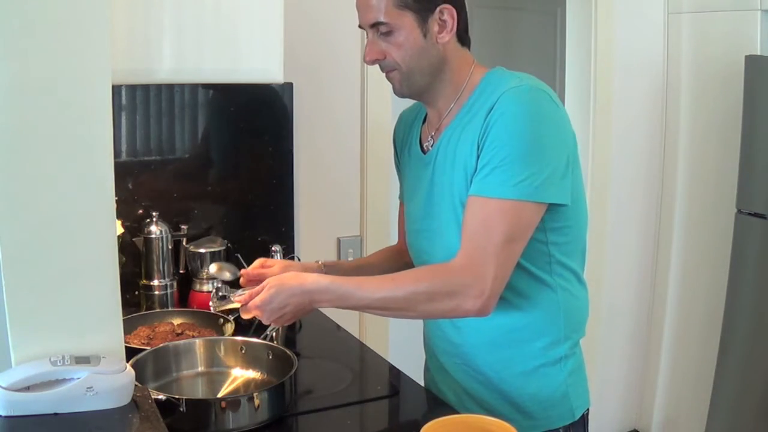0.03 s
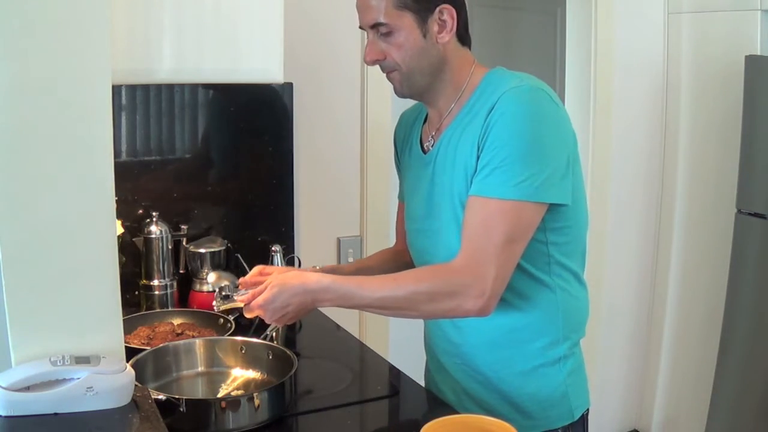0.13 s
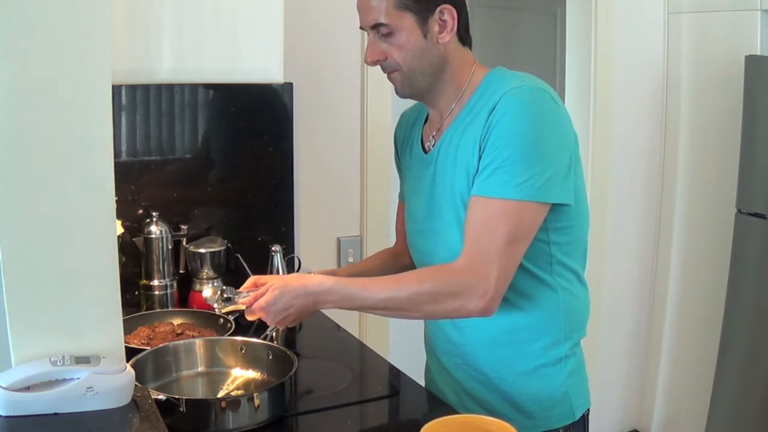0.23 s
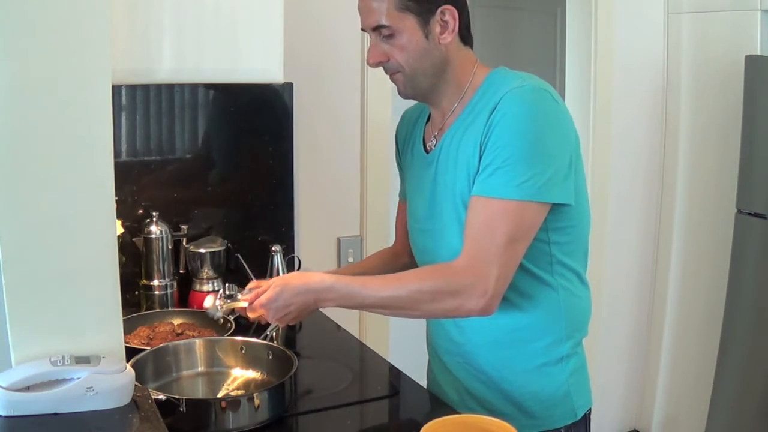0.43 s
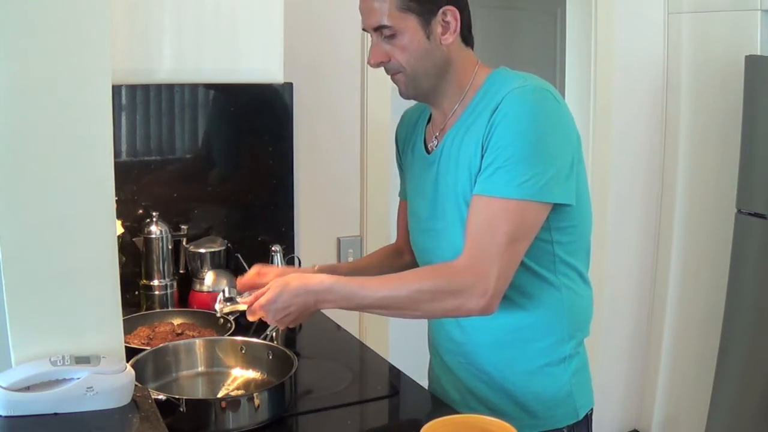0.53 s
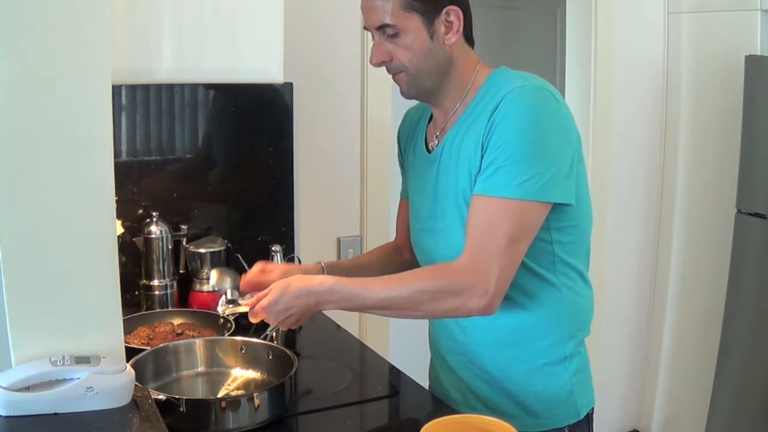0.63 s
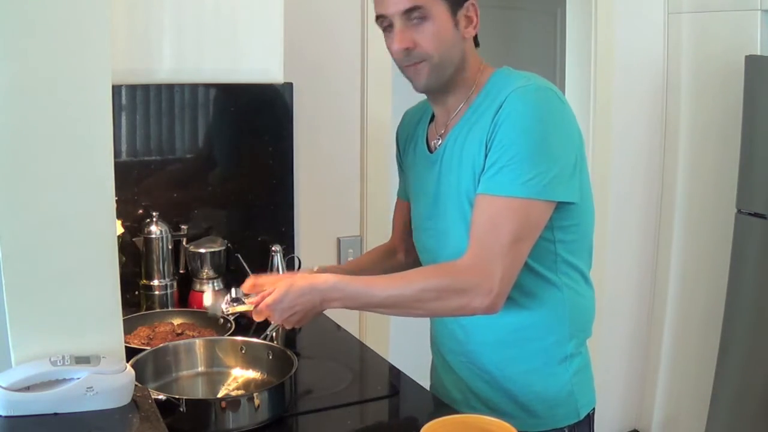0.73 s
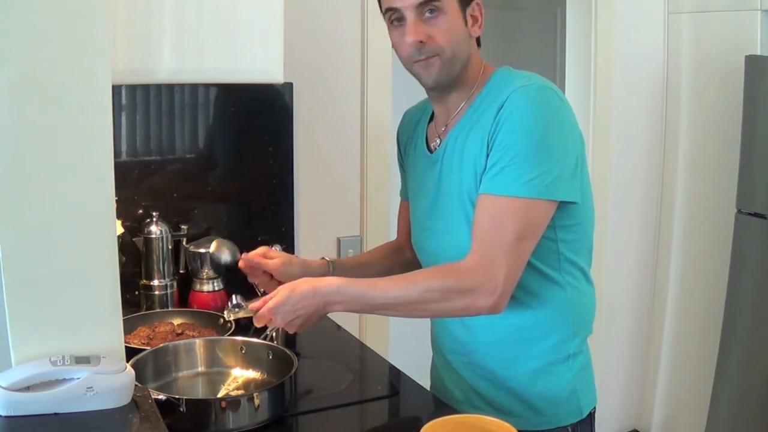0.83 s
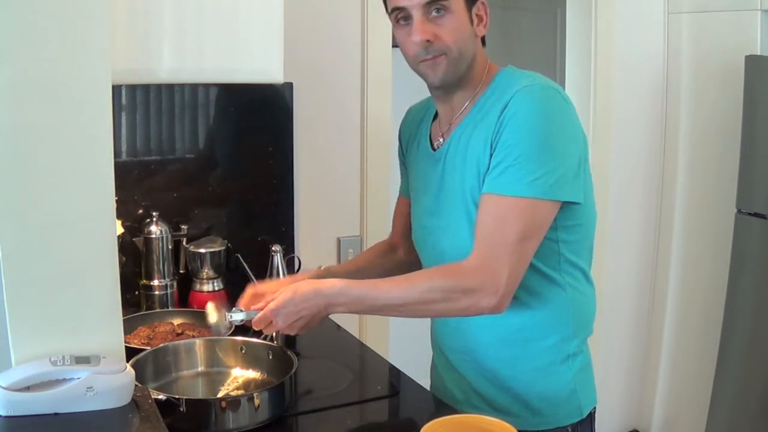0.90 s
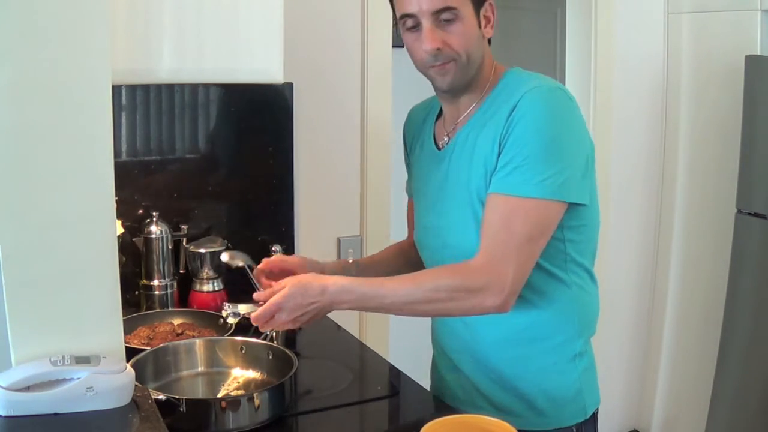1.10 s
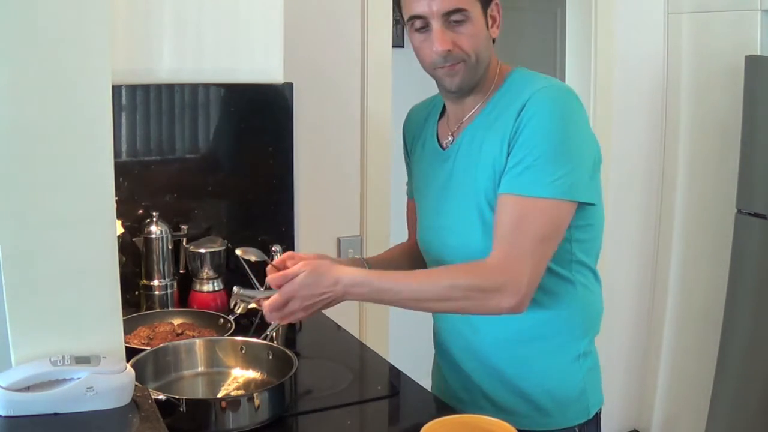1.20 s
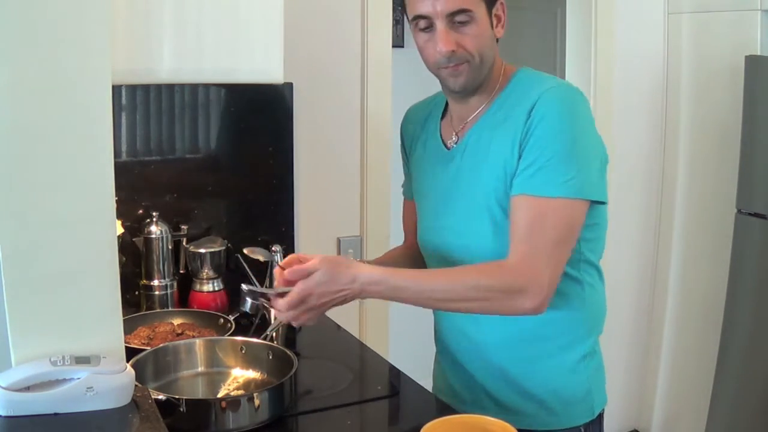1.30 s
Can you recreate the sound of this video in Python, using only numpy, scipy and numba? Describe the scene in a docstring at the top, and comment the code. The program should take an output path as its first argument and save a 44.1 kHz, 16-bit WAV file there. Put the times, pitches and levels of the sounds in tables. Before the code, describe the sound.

Three hard, dry metallic clacks of spoon on garlic press ring briefly off kitchen walls; garlic drops into hot oil, which sizzles on with small crackles above low fan noise, heard from a camera a few metres off.

```python
"""Garlic press and hot oil

Modal synthesis: a spoon knocks three times on a metal garlic press, each knock a click plus decaying modes,
while an earlier knock still dies away. A train of random bubble clicks over hiss makes hot oil sizzle
as garlic drops in; coloured noise and wavering tones make the extractor fan. Dense decaying noise echoes
form the hard-walled kitchen, heard by a camera a few metres from the press."""
import sys
import numpy as np
from scipy import signal
from scipy.fft import rfft, irfft, next_fast_len
from scipy.io import wavfile
from scipy.ndimage import uniform_filter1d
from numba import njit

SR = 44100
rng = np.random.default_rng(int(sys.argv[2]) if len(sys.argv) > 2 else 0)


def invert_db(x):
    """Field ratio 10**(x/20) for x, a level in decibels (scalar or array-like)."""
    u = np.asarray(x, float) / 20
    return 10 ** u


def bounce(signal):
    """Save signal as a 16-bit WAV file at the path given by the first command-line argument."""
    frames = np.transpose(np.atleast_2d(signal))
    limited = np.clip(frames, -1, 1)
    pcm = np.round(limited * 32767).astype(np.int16)
    wavfile.write(sys.argv[1], SR, pcm)


N = 59535  # length in samples
LEAD_S = 0.2  # knocks are computed from this long before the start


def curve(hz, table):
    """Logarithmic frequency scale: interpolates (f/Hz, value) points."""
    points = np.array(table, float)
    return np.interp(np.log(np.maximum(hz, 1)), np.log(points[:, 0]), points[:, 1])


def colour(x, table):
    """Linear filtering: weights the spectrum by (f/Hz, level/dB) points."""
    n = next_fast_len(x.shape[-1])
    hz = np.arange(n // 2 + 1) * SR / n
    return irfft(rfft(x, n) * invert_db(curve(hz, table)), n)[..., :x.shape[-1]]


def level(x, db):
    """Root-mean-square level: scales the signal to db."""
    return x * invert_db(db) / np.sqrt(np.mean(x ** 2))


def timeline(table):
    """Amplitude envelope: gain through (t/s, level/dB) points."""
    points = np.array(table, float)
    return invert_db(np.interp(np.arange(N) / SR, points[:, 0], points[:, 1]))


# spectral density of the fan's air noise, relative: f/Hz, level/dB
FAN_SPECTRUM = [(15, -34), (25, -17), (84, 0), (223, -3), (285, -6), (818, -11), (911, -13.5), (1260, -19),
                (1370, -19), (3340, -13.5), (4030, -14.5), (4610, -18.5), (16000, -23.5)]
# filter that makes the side part of the air noise: f/Hz, level/dB
FAN_SIDE = [(60, -32), (130, -27), (290, -13.5), (640, -8.5), (1410, -1.5), (3100, -8.5), (6820, -6),
            (15000, -60)]
# tones of the fan before its swell: f/Hz, rms level/dB, width/Hz (twice the rms frequency wander)
FAN_TONES = [(175.7, -55.5, 6.2), (350.2, -58, 9.3), (397.3, -55, 4.4)]
# slow swell of the whole fan: t/s, level/dB
FAN_SWELL = [(0, -2.5), (.5, -1), (.9, 0), (1.35, -0.5)]


def fan():
    """Broadband flow noise plus frequency-modulated tones; returns mid and side."""
    air = level(colour(rng.standard_normal((2, N)), FAN_SPECTRUM), -45.5)  # dB
    mid, side = air[0], colour(air[1], FAN_SIDE)
    t = np.arange(N) / SR
    for hz, db, width_hz in FAN_TONES:
        drift = level(uniform_filter1d(rng.standard_normal(N), int(SR / 20)), 0)
        cycles = hz * t + width_hz / 2 * np.cumsum(drift) / SR
        mid = mid + invert_db(db) * np.sqrt(2) * np.sin(2 * np.pi * cycles)
    return np.array([mid, side]) * timeline(FAN_SWELL)


# reverberation time of the kitchen: f/Hz, t60/s
ROOM_T60 = [(800, 0.48), (1500, 0.48), (3000, 0.44), (5500, 0.45), (8000, 0.31), (13000, 0.28)]
# filter that makes the side part of the echoes: f/Hz, level/dB
ROOM_SIDE = [(60, -25), (120, -23), (240, -20), (480, -26), (950, -9), (1890, -8.5), (3770, -8),
             (7520, -10.5), (15000, -64)]
FIRST_ECHO_S, ECHO_SPIKE_DB = 0.00078, 3  # delay of the first echo; scatter of echo strength
EARLY_DB, EARLY_S = 3.5, 0.0016  # extra strength and fade time constant of the echoes off the worktop


def room(dry):
    """Diffuse reverberation: random echoes decay exponentially band by band; returns mid and side."""
    t = np.arange(int(0.8 * SR)) / SR
    arrived = t > FIRST_ECHO_S
    spikes = invert_db(ECHO_SPIKE_DB * rng.standard_normal(len(t)))
    echoes = rng.standard_normal((2, len(t))) * spikes * arrived
    echoes = echoes * (1 + invert_db(EARLY_DB) * np.exp(-t / EARLY_S))

    log_hz = np.log(np.maximum(np.fft.rfftfreq(len(t), 1 / SR), 1))
    log_centres = np.log([hz for hz, _ in ROOM_T60])
    tail = 0
    for k, (_, t60) in enumerate(ROOM_T60):
        # neighbouring bands crossfade on the log-frequency axis
        share = np.interp(log_hz, log_centres, np.arange(len(log_centres)) == k)
        fading = echoes * invert_db(-60 * t / t60)
        tail = tail + irfft(rfft(fading) * share, len(t))
    tail = tail / np.sqrt(np.sum(tail[0] ** 2)) * arrived  # unit energy in mid
    wet = signal.fftconvolve(dry[None], tail, axes=1)[:, :len(dry)]
    return np.array([wet[0], colour(wet[1], ROOM_SIDE)])


# spectral density of the sizzle, relative: f/Hz, level/dB
SIZZLE_SPECTRUM = [(880, -25), (1500, -10.5), (1810, -15), (2160, -8), (3410, -11), (4780, -6.5),
                   (5880, -9.5), (8320, 0.5), (10900, 3.5), (16000, -13.5)]
# envelope of the sizzle, which jumps as the garlic drops in: t/s, level/dB
SIZZLE_LEVEL = [(0, -54.5), (.165, -53), (.169, -40.5), (.2, -42.5), (.3, -39.5), (.45, -39), (.7, -38.5),
                (.95, -39), (1.1, -40), (1.35, -40)]
# louder spits of oil: t/s, peak level/dB, f/Hz, t60/s
SPITS = [(.1705, -25.5, 8160, 0.012), (.176, -28, 11200, 0.012), (.1875, -28, 10600, .008),
         (.9187, -13.5, 10500, 0.0012), (.9915, -19, 10000, 0.0027)]
BUBBLES_PER_S, BUBBLE_SPREAD_DB = 2900, 2.5  # mean rate; mean of the exponential scatter in level
HISS_DB = -1.5  # hiss relative to the bubbles


def sizzle():
    """Random impulse train: tiny steam bubbles burst as clicks over a hiss; decaying sines spit louder."""
    burst = rng.random(N) < BUBBLES_PER_S / SR
    size_db = -BUBBLE_SPREAD_DB * np.log(1 - rng.random(N))
    pops = burst * invert_db(size_db) * rng.choice([-1, 1], N)
    hiss = invert_db(HISS_DB) * rng.standard_normal(N)
    oil = level(colour(level(pops, 0) + hiss, SIZZLE_SPECTRUM), 0) * timeline(SIZZLE_LEVEL)
    for s, db, hz, t60 in SPITS:
        since = np.maximum(np.arange(N) / SR - s, 0)  # the sine is zero until the spit
        oil = oil + invert_db(db - 60 * since / t60) * np.sin(2 * np.pi * hz * since)
    return oil


def click(table, count):
    """Minimum phase: the most compact causal click with the given (f/Hz, level/dB) colour, energy 1."""
    hz = np.arange(count // 2 + 1) * SR / count
    cepstrum = irfft(np.log(invert_db(curve(hz, table))), count)
    # folding the cepstrum onto positive times makes the click causal
    fold = np.r_[1, np.full(count // 2 - 1, 2), 1, np.zeros(count // 2 - 1)]
    out = irfft(np.exp(rfft(cepstrum * fold)), count)
    return out / np.sqrt(np.sum(out ** 2))


# knocks of spoon on press: t/s, relative level/dB, contact time constant/ms, click relative level/dB
KNOCKS = [(-0.12, -14, 0.18, 10.5), (0.2036, -11, 0.038, 16.5), (0.4543, -9, 0.073, 15),
          (0.7262, -10, 0.12, 14)]
# modes of press and spoon: f/Hz, t60/s, then relative level/dB in each knock, which lands on another spot
METAL_MODES = [(1044, 0.02, -20, -23.5, -51, -39.5), (1533, 0.005, -30, -17.5, -14, -13),
               (1922, 0.0096, -8.5, -25, -10.5, -3.5), (2663, 0.011, -39, -21, -15, -6.5),
               (3234, 0.01, -19, -1, -0.5, -18), (3710, 0.019, -40, -7.5, -7, -9.5),
               (4026, 0.026, -5, -5, -13, -37), (4200, 0.01, -5, -16, -10.5, -44),
               (5450, 0.0088, -17, -13, -18, -10.5), (6390, 0.0077, -3.5, 0.5, -9, -37),
               (7180, 0.027, -10, -9, -7, -15), (7800, .015, -9, -3.5, 0.5, -4),
               (8830, 0.012, -20, -14.5, -6, -15), (10000, 0.0099, -10, -2, -7.5, -4),
               (10800, 0.0053, -21, -18, -26, -27), (12860, 0.0087, -18, -7.5, -12, -5.5)]
# spectral density of the click, one list for each knock, relative: f/Hz, level/dB
CLICK_SPECTRA = [
    [(530, -54), (900, -15), (1910, -19), (2820, -7), (4060, -2.5), (4460, -5.5), (15000, -42)],
    [(410, -58), (700, -26), (1350, -16.5), (1670, -4.5), (2830, -7), (3800, 1.5), (6110, 2), (7130, -1.5),
     (8210, -6.5), (11800, -11), (12700, -8), (15000, -37)],
    [(410, -59), (700, -31.5), (952, -19), (1080, -30), (1570, -23), (2160, -9), (3760, 7.5), (4110, -2),
     (5170, 1.5), (6110, -6), (7410, -8.5), (15000, -25.5)],
    [(410, -60), (700, -28), (776, -48), (905, -18), (2660, -4), (3180, 1), (3800, 5.5), (4380, -18.5),
     (5240, 2), (6690, -14), (8980, -2.5), (15000, -34)],
]


def knocks():
    """Modal vibration: each contact clicks and rings damped modes. Starts LEAD_S early."""
    out = np.zeros(N + int(LEAD_S * SR))
    t = np.arange(8192) / SR
    for k, (s, db, contact_ms, click_db) in enumerate(KNOCKS):
        ring = 0
        for j, mode in enumerate(METAL_MODES):
            hz, t60, mode_db = mode[0], mode[1], mode[2 + k]
            phase = np.pi * (j % 2)  # alternate modes start in opposite directions
            ring = ring + invert_db(mode_db - 60 * t / t60) * np.sin(2 * np.pi * hz * t + phase)
        ring = ring * (1 - np.exp(-t / (contact_ms / 1000)))  # longer contact, softer onset
        crack = invert_db(click_db) * click(CLICK_SPECTRA[k], len(t))
        at = int((s + LEAD_S) * SR)
        out[at:at + len(t)] += invert_db(db) * (ring + crack)
    return out


# stereo balance of stove and knocks, direct and reverberant: f/Hz, left - right level/dB
STOVE_BALANCE = [(500, -1), (1000, 0), (2000, -1), (4000, -1.9), (7000, 0.5)]
# stereo balance of the fan: f/Hz, left - right level/dB
FAN_BALANCE = [(60, 0.5), (110, -0.5), (200, 0.0), (380, -0.5), (700, -1), (1290, -1.5), (2380, 1),
               (4400, 0), (8120, -2), (15000, 0.5)]
DIRECT_DB = -5  # direct path of the knocks
KNOCK_WET_DB, SIZZLE_WET_DB = 6, -2  # sent into the room


def balance(mid, side, table):
    """Interchannel level difference: half the (f/Hz, level/dB) goes to each ear, with opposite signs."""
    half = np.array(table) * [1, 0.5]
    return np.array([colour(mid + side, half), colour(mid - side, half * [1, -1])])


def scene():
    """Superposition: knocks and oil arrive directly and by way of the room; the fan adds to them."""
    lead = int(LEAD_S * SR)
    metal, oil = knocks(), sizzle()
    sent = invert_db(KNOCK_WET_DB) * metal + invert_db(SIZZLE_WET_DB) * np.pad(oil, (lead, 0))
    mid, side = room(sent)[:, lead:]
    mid = mid + invert_db(DIRECT_DB) * metal[lead:] + oil
    air_mid, air_side = fan()
    return balance(mid, side, STOVE_BALANCE) + balance(air_mid, air_side, FAN_BALANCE)


@njit
def follow(x, up, down):
    """Envelope detection: a one-pole smoother that rises fast and falls slowly."""
    envelope, e = np.empty(len(x)), 1e-4
    for i in range(len(x)):
        e += (x[i] - e) * (up if x[i] > e else down)
        envelope[i] = e
    return envelope


def top_cut(x):
    """Nothing passes above the cut-off."""
    return signal.sosfilt(signal.butter(12, 16670, fs=SR, output="sos"), x)


GAIN_FROM_DB, GAIN_RATIO = -21.5, 1.073  # threshold on the envelope; compression ratio
GAIN_ATTACK_S, GAIN_RELEASE_S = 0.0012, 0.022  # time constants


def record(dry):
    """Dynamic compression: the camera turns loud sounds down, rounds the peaks and cuts the top."""
    envelope = follow(np.abs(dry).mean(0), 1 / (GAIN_ATTACK_S * SR), 1 / (GAIN_RELEASE_S * SR))
    held = dry * np.minimum(invert_db(GAIN_FROM_DB) / envelope, 1) ** (1 - 1 / GAIN_RATIO)
    rounded = np.tanh(1.242 * held) / 1.185
    low_pass = signal.ellip(8, 0.2, 30, 15700, fs=SR, output="sos")  # ripple dB, stopband dB, Hz
    mix = signal.sosfilt(low_pass, rounded)
    return top_cut(mix)


dry = scene()
out = record(dry)
bounce(out)
```